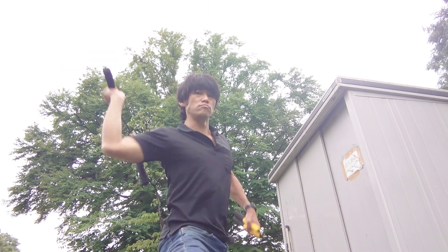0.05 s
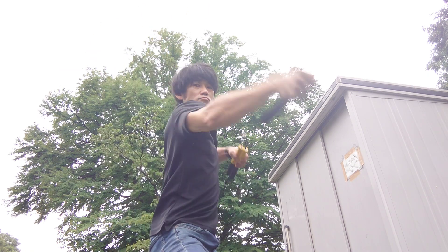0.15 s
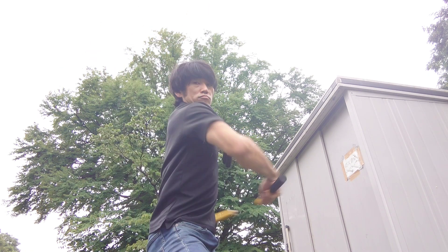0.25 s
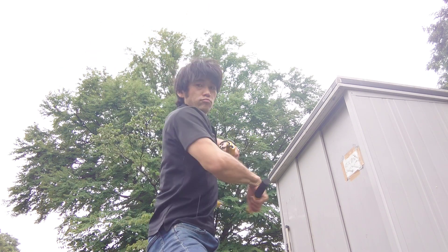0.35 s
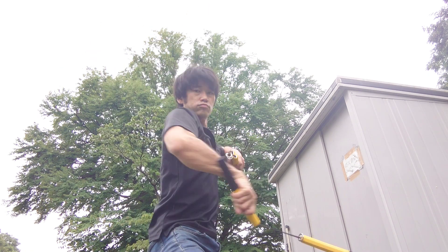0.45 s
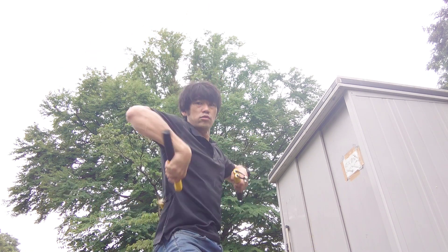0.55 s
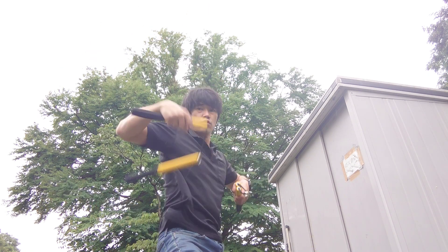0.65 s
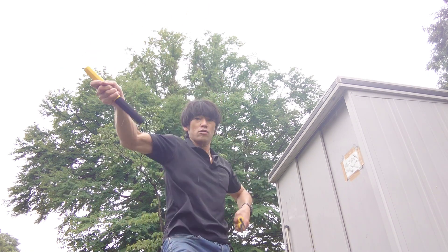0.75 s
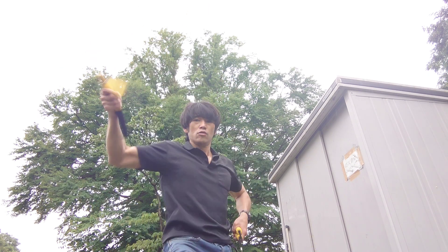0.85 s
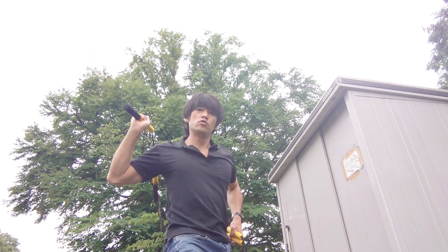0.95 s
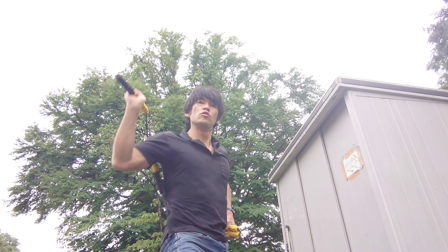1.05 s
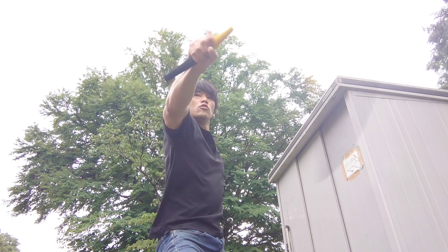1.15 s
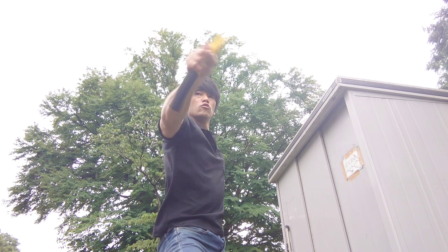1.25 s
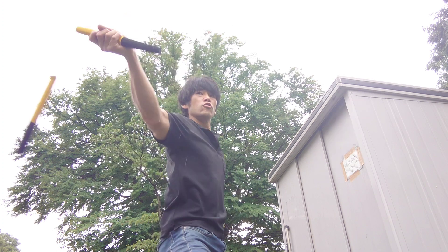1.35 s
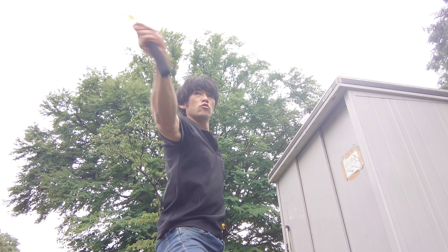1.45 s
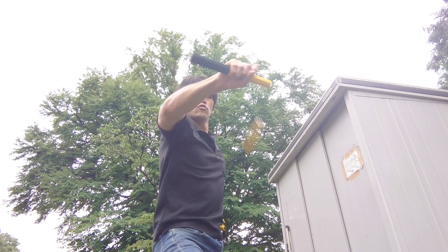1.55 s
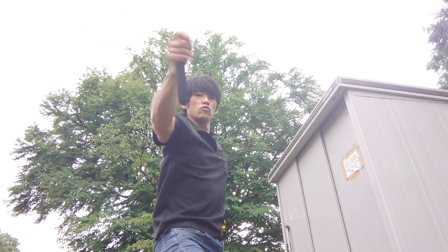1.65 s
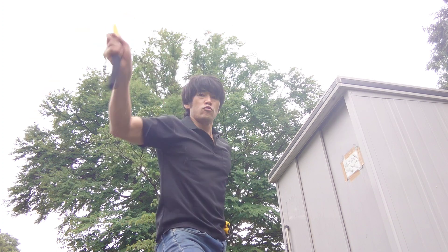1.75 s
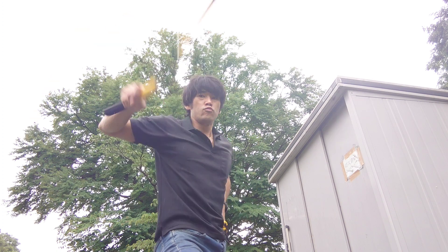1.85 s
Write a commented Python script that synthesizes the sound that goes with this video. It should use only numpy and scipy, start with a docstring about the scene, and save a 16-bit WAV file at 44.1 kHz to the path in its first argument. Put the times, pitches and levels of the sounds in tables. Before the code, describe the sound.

Chained sticks swung close to the microphone outdoors: a heavy, fluttering low whoosh comes early, then bright chain rattle and clinks with dry clacks and palm thuds, sharpest near the middle, over faint distant outdoor rumble.

```python
"""Outdoors, by a shed wall, two pairs of chained sticks are swung close to a camera.
Each passing stick sheds air whirls, built from sines, under a swish of shaped noise. Chain links rattle and
clink, caps clack and sticks thud into the hands: each contact rings decaying modes with a crack of grit.
The wall answers faintly through scattered, fading noise; distant outdoor noise lies beneath."""
import sys
import numpy as np
from scipy import signal
from scipy.fft import rfft, irfft, next_fast_len
from scipy.io import wavfile
from scipy.ndimage import uniform_filter1d, map_coordinates

SR = 44100
rng = np.random.default_rng(int(sys.argv[2]) if len(sys.argv) > 2 else 0)


def decibels_to_gain(level_db):
    """Convert a level in decibels to a linear amplitude gain (20 dB per decade)."""
    exponent = np.asarray(level_db, float) / 20
    return 10 ** exponent


def persist_wave(psi):
    """Save psi, clipped to +-1, as 16-bit WAV."""
    counts = np.round(np.clip(psi, -1, 1) * 32767).astype(np.int16)
    wavfile.write(sys.argv[1], SR, np.atleast_2d(counts).T)


N = 83790  # length in samples


def unit(x):
    """Normalisation: scales a signal to rms 1."""
    return x / np.sqrt(np.mean(x ** 2) + 1e-20)


def along(points, hz):
    """Logarithmic frequency scale: interpolates (Hz, value) points along it."""
    f, v = np.transpose(points)
    return np.interp(np.log(hz + 1), np.log(f + 1), v)


def wobble(rate):
    """Slow random fluctuation: a smooth curve through rate random knots a second."""
    knots = rng.standard_normal(int(N * 400 / SR) + 4)
    return map_coordinates(knots, [np.arange(N) * min(rate, 400) / SR])


def filtered(x, response):
    """Linear filtering: multiplies the spectrum of x by a response of frequency."""
    m = next_fast_len(N + SR // 4)
    return irfft(rfft(x, m) * response(np.fft.rfftfreq(m, 1 / SR)), m)[..., :N]


# Coherence of a spread-out noise. Each row: frequency in Hz, left-right likeness (1 is identical).
LIKENESS = [(200, 0.93), (1000, 0.64), (4000, 0.13)]


def rush(spectrum, patchy_db):
    """Turbulent noise: shaped stereo noise of rms 1, with patches of random gain in time and frequency."""
    cells = signal.stft(rng.standard_normal((2, N + 512)), nperseg=256)[2]
    field = rng.standard_normal(cells.shape[1:])
    field = uniform_filter1d(uniform_filter1d(field, size=4, axis=0), size=5, axis=1)
    pair = signal.istft(cells * decibels_to_gain(patchy_db * unit(field)), nperseg=256)[1][:, :N]

    def mid_side_response(hz):
        # the share of mid and side sets the likeness of left and right
        angle = np.arccos(np.clip(along(LIKENESS, hz), -1, 1)) / 2
        return decibels_to_gain(along(spectrum, hz)) * [np.cos(angle), np.sin(angle)]

    mid, side = filtered(pair, mid_side_response)
    return unit(np.array([mid + side, mid - side]))


# Spectrum of the distant surroundings. Each row: frequency in Hz, relative density in dB per Hz.
OUTDOOR_SPECTRUM = [(15, -38), (25, -0.5), (76, 8.5), (262, -10), (420, -5), (1100, -15.5), (7880, -25.5),
                    (15900, -63)]


def outdoors():
    """Ambient noise: many distant sources merge into a faint, mostly low-pitched rush."""
    return decibels_to_gain(-44.5) * rush(OUTDOOR_SPECTRUM, patchy_db=2.5)


WALL_DB, WALL_T60_S, WALL_DELAY_S = -7, 0.036, 0.0012


def wall(hits):
    """Diffuse reflection: wall and ground return a short scattered answer that fades exponentially."""
    t = np.arange(SR // 5) / SR
    tail = rng.standard_normal((2, len(t))) * decibels_to_gain(-60 * t / WALL_T60_S) * (t > WALL_DELAY_S)
    answer = signal.fftconvolve(hits, tail / np.linalg.norm(tail[0]), axes=1)[:, :N]
    return decibels_to_gain(WALL_DB) * answer


# Spectrum of the air stirred by a stick. Each row: frequency in Hz, relative density in dB per Hz.
SWISH_SPECTRUM = [(240, -18.5), (400, -1), (496, -5.5), (655, -4.5), (1990, -25), (15900, -33.5)]
# Passes of a stick through the air. Each row: middle in seconds, half length in seconds,
# relative whirl level in dB, nominal shedding rate in Hz, relative swish level in dB.
PASSES = [(0.037, 0.03, -67, 97, -44), (.257, 0.014, -7.5, 192, -16.5), (0.295, 0.017, -17.5, 110.5, -32.5),
          (0.57, 0.043, -45, 95, -42.5), (0.808, 0.022, -34, 117.6, -36.5),
          (0.956, 0.052, -44, 168.7, -39.5), (1.15, 0.021, -34.5, 70, -42), (1.245, 0.02, -30, 160, -31.5),
          (1.27, 0.029, -21.5, 88.9, -37), (1.437, 0.045, -37.5, 79.6, -41.5),
          (1.607, 0.015, -28.5, 99.65, -39.5), (1.651, 0.036, -31.5, 83.8, -48),
          (1.81, 0.057, -31.5, 78.3, -44.5)]


def swish():
    """Turbulence noise: each passing stick stirs a broad rush that swells and fades."""
    t = np.arange(N) / SR
    gain = np.zeros(N)
    for middle_s, half_s, _, _, swish_db in PASSES:
        swell = np.exp(-((t - middle_s) / half_s) ** 2)
        gain += decibels_to_gain(swish_db) * swell ** 0.48  # a longer swell than that of the whirls
    return gain * rush(SWISH_SPECTRUM, patchy_db=4.0)


WHIRL_JITTER, WHIRL_WOBBLE_DB = .07, 3  # random sway of the rate (fraction) and of each partial's level
SAG = .05  # the shedding rate falls through each pass
FAST_HZ = 187  # slower passes lose their overtones
# Partials of the whirl tone. Each row: multiple of the shedding rate, relative level in dB.
WHIRL_PARTIALS = [(0.301, -9.5), (1, 0), (1.45, -5.5), (2.1, -10.5)]


def whirls():
    """Vortex shedding: whirls leave a passing stick at a rate set by its speed and sound a low tone."""
    t = np.arange(N) / SR
    pace = np.cumsum(1 + WHIRL_JITTER * wobble(90)) / SR
    sway = [decibels_to_gain(level_db + WHIRL_WOBBLE_DB * wobble(70)) for _, level_db in WHIRL_PARTIALS]
    whirl = np.zeros(N)
    for middle_s, half_s, whirl_db, shed_hz, _ in PASSES:
        swell = np.exp(-((t - middle_s) / half_s) ** 2)
        cycles = shed_hz * (pace + SAG * half_s * swell)
        phases = rng.uniform(0, 2 * np.pi, len(WHIRL_PARTIALS))
        for (multiple, _), gain, phase in zip(WHIRL_PARTIALS, sway, phases):
            speed_gain = min(shed_hz / FAST_HZ, 1) ** max(multiple - 1, 0)
            partial = np.sin(2 * np.pi * multiple * cycles + phase)
            whirl += decibels_to_gain(whirl_db) * swell * gain * speed_gain * partial
    return whirl


FAVOUR_DB = 12  # how far modes remote from the strongest ring are held down
LAG_S, LAG_S_PER_DB = .00008, .000011  # the left port hears later, less so where a row pans left


def strikes(rows, modes, trim_db, crack_db, rise_s, favour_hz, spread, size, left_db=0, order=0):
    """Modal excitation: each contact rings the modes, most those near its strongest ring, with a crack of grit."""
    hz, mode_db, t60 = np.transpose(modes)[:, :, None]
    out = np.zeros((2, N + size))
    u = np.arange(size) / SR
    for start_s, db, top_hz, *pan in rows:
        draw = rng.standard_normal((2, len(modes), 1))
        nearness = np.exp(-((hz - top_hz) / favour_hz) ** 2)
        gain = decibels_to_gain(mode_db + 3.6 * draw[0] + FAVOUR_DB * (nearness - 1))
        tuned_hz = hz * (1 + spread * draw[1])
        grit = np.diff(rng.standard_normal((2, size + order)), order)  # a higher order is brighter
        grit = unit(grit) * decibels_to_gain(crack_db - 60 * u / t60.min())
        lag_s = max(LAG_S - LAG_S_PER_DB * sum(pan), 0)
        for side, t in enumerate((np.maximum(u - lag_s, 0), u)):  # left, right
            ring = gain * decibels_to_gain(-60 * t / t60) * np.sin(2 * np.pi * tuned_hz * t)
            ring = ring.sum(0) / np.linalg.norm(gain) + grit[side]
            ring = ring * (1 - np.exp(-t / rise_s))
            side_db = (1.0 - side) * (left_db + sum(pan))
            out[side, round(start_s * SR):][:size] += decibels_to_gain(db + trim_db + side_db) * ring
    return out[:, :N]


# Sticks caught in the palm. Each row: start in seconds, relative level in dB, strongest ring in Hz.
THUDS = [(0.083, -21.5, 620), (0.144, -19.5, 850), (0.679, -15, 600), (0.821, -15.5, 790),
         (1.1025, -24.5, 560), (1.1395, -16, 457), (1.362, -32, 407), (1.396, -30, 900)]
# Modes of the stick. Each row: nominal frequency in Hz, relative level in dB, 60 dB decay in seconds.
STICK_MODES = [(486, -8, 0.03), (685, 3, 0.015), (900, 1, .012), (1440, 9.5, 0.011)]


def thuds():
    """Damped impact: a stick caught in the palm rings its low modes dully."""
    return strikes(THUDS, STICK_MODES, 6.5, crack_db=-22, rise_s=0.00058, favour_hz=450,
                   spread=0.045, size=2000)


TAUT_DB = -55.5  # the chain never falls quite silent
SNAP_S, SETTLE_S = 0.0061, 0.011  # linear rise, exponential time constant of the fall
# Spells of slack chain. Each row: start in seconds, length before settling in seconds, rattle gain in dB.
SLACK_SPELLS = [(0, 0.094, -53.5), (0.094, 0.059, -51.5), (0.184, 0.021, -41.5), (0.396, 0.047, -47.5),
                (0.47, 0.066, -41), (0.542, 0.048, -40.5), (0.681, 0.065, -35), (0.78, 0.076, -39.5),
                (0.857, 0.066, -38.5), (0.934, 0.11, -42.5), (1.105, 0.11, -39), (1.23, 0.087, -46.5),
                (1.366, 0.056, -39), (1.438, 0.046, -38.5), (1.588, 0.038, -45), (1.7, 0.14, -52),
                (1.823, 0.068, -42)]


def slackness():
    """Amplitude envelope: each slack spell starts quickly, holds and settles more slowly."""
    t = np.arange(N) / SR
    gain = np.full(N, decibels_to_gain(TAUT_DB))
    for start_s, hold_s, db in SLACK_SPELLS:
        rise = np.clip((t - start_s) / SNAP_S, 0, 1)
        settle = np.exp(-np.maximum(t - start_s - hold_s, 0) / SETTLE_S)
        gain += decibels_to_gain(db) * rise * settle
    return gain


# Spectrum of the blurred chain. Each row: frequency in Hz, relative density in dB per Hz.
JANGLE_SPECTRUM = [(590, -5), (1000, -8), (6010, -0.5), (7580, -10.5), (11000, -5), (15900, -2)]


def jangle():
    """Incoherent summation: contacts too dense to tell apart blur into fluctuating noise."""
    return rush(JANGLE_SPECTRUM, patchy_db=3.5) * decibels_to_gain(4.14 * wobble(110))


RATTLE_PER_S, RATTLE_SPREAD_DB, RATTLE_DB = 400, 2.5, -5
LINK_FAVOUR_HZ = 500
# Modes of a link. Each row: nominal frequency in Hz, relative level in dB, 60 dB decay in seconds.
LINK_MODES = [(7900, -11.5, 0.045), (9780, -5, 0.018), (10800, -5.5, 0.046), (11160, -8, 0.017),
              (12500, 7.5, 0.013), (13200, 0.5, 0.011), (14000, -5, 0.019), (15040, -5, 0.011)]


def rattle():
    """Random impact process: links chatter in tiny contacts at random times, levels and pitches."""
    draw = rng.random((int(RATTLE_PER_S * N / SR), 3))
    start_s = draw[:, 0] * N / SR
    level_db = -RATTLE_SPREAD_DB * np.log(draw[:, 1] + 1e-3)
    top_hz = 9000 + 7000 * draw[:, 2]
    contacts = strikes(np.c_[start_s, level_db, top_hz], LINK_MODES, 0, crack_db=6.0, rise_s=0.00032,
                       favour_hz=LINK_FAVOUR_HZ, spread=0.03, size=400, left_db=-6.0, order=2)
    return decibels_to_gain(RATTLE_DB) * unit(contacts)


# Hard contacts of link on link. Each row: start in seconds, relative level in dB, strongest ring in Hz.
CLINKS = [(0.1256, -23, 10800), (0.4759, -30, 13900), (0.4917, -16, 12500), (0.5182, -20, 15060),
          (0.6883, -19.5, 12500), (0.7104, -11, 14000), (0.7458, -14.5, 13800), (0.8233, -11.5, 9800),
          (0.8849, -12.5, 11300), (0.9, -12, 10800), (1.0014, -18, 12900), (1.1388, -15, 11800),
          (1.3782, -18.5, 13000), (1.4574, -15.5, 7860), (1.4657, -11.5, 15200), (1.5572, -33, 14100),
          (1.5941, -25, 14300), (1.611, -34, 11500), (1.7382, -28.5, 13700), (1.7767, -19, 13900),
          (1.8507, -11.5, 11700)]


def clinks():
    """Modal ringing: a hard contact of link on link sounds high, lightly damped modes."""
    return strikes(CLINKS, LINK_MODES, 5, crack_db=2, rise_s=0.0027, favour_hz=LINK_FAVOUR_HZ,
                   spread=.008, size=2000, left_db=-8.5, order=1)


def chain():
    """Superposition: slackness governs rattle and jangle, and the clinks stand clear of it."""
    return slackness() * (rattle() + jangle()) + clinks()


# Caps striking a stick. Each row: start in seconds, relative level in dB, strongest ring in Hz,
# left over right in dB.
CLACKS = [(0.0812, -19.5, 5170, -2.5), (0.105, -27.5, 1710, 1.5), (0.1384, -17, 2800, -2.5),
          (0.2075, -23, 2640, -2), (0.4921, -23, 1590, 1), (0.5668, -24, 4500, -2.5),
          (0.6796, -16.5, 5360, -3), (0.7055, -14.5, 2600, -3.5), (0.734, -14, 2230, 0),
          (0.8141, -5.5, 3240, 3.5), (0.8205, -14.5, 3160, 4.5), (0.8235, -9, 6200, 3.5),
          (0.9005, -19.5, 2940, -1.5), (1.1027, -22.5, 3180, -5.5), (1.1401, -6, 5870, -1.5),
          (1.1606, -22.5, 2760, -3), (1.2118, -21, 2690, 1.5), (1.2341, -16, 2950, 5),
          (1.3979, -20, 2900, 9), (1.7606, -37, 3000, 9.5), (1.8531, -19, 2680, -3)]
# Modes of a metal cap. Each row: nominal frequency in Hz, relative level in dB, 60 dB decay in seconds.
CAP_MODES = [(1766, 2.5, 0.0059), (2200, -2.5, 0.011), (2706, -1.5, 0.011), (3078, 6.5, 0.006),
             (3460, 3.5, 0.0043), (4670, 10, 0.005), (5610, 2.5, 0.0077), (6200, 9, 0.0071)]


def clacks():
    """Rapidly damped impact: a metal cap on a stick gives a short, dry clack."""
    return strikes(CLACKS, CAP_MODES, 11, crack_db=-8, rise_s=0.00056, favour_hz=610,
                   spread=0.015, size=800)


SHADE_HZ, SHADE_WIDTH_HZ, SHADE_DB = 5800, 1520, 6.5


def shaded(hits):
    """Acoustic shadow: the camera body shades the left port from close hits in one band."""
    def response(hz):
        band = np.exp(-((hz - SHADE_HZ) / SHADE_WIDTH_HZ) ** 2)
        return decibels_to_gain(-SHADE_DB * band * [[1], [0]])

    return filtered(hits, response)


LEFT_DB = -1.08  # left gain of air and outdoors; the right has the opposite


def scene():
    """Superposition: shaded hits and their echo add to the air and the distant outdoors."""
    hits = shaded(chain() + clacks() + thuds())
    bed = whirls() + swish() + outdoors()
    return hits + wall(hits) + bed * decibels_to_gain([[LEFT_DB], [-LEFT_DB]])


def band_limit(x):
    """A steep low-pass at the top of the band."""
    return signal.sosfilt(signal.butter(12, 16990, fs=SR, output="sos"), x)


DIP_HZ, DIP_WIDTH_HZ, DIP_DB = 8570, 2030, 4
TOP_HZ = 15950


def record(dry):
    """Transducer response: a microphone dip, clipping at full scale and a band limit shape the mix."""
    heard = filtered(dry, lambda hz: decibels_to_gain(-DIP_DB * np.exp(-((hz - DIP_HZ) / DIP_WIDTH_HZ) ** 2)))
    clipped = np.clip(heard, -1, 1)
    mix = filtered(clipped, lambda hz: hz < TOP_HZ)
    return band_limit(mix)


dry = scene()
out = record(dry)
persist_wave(out)
```